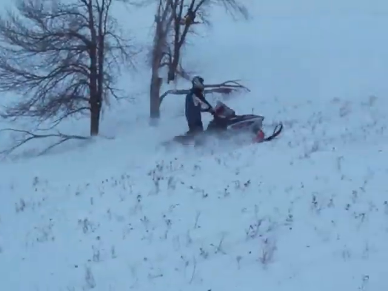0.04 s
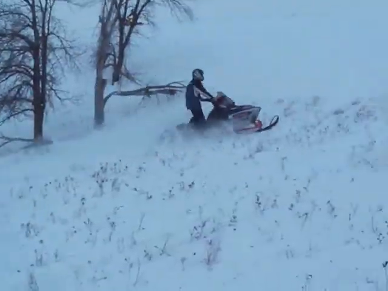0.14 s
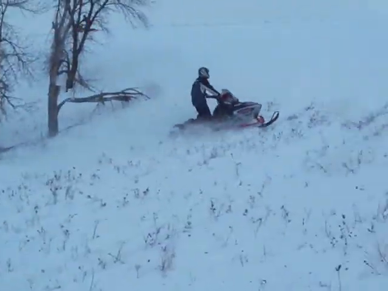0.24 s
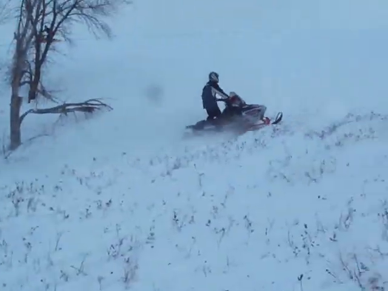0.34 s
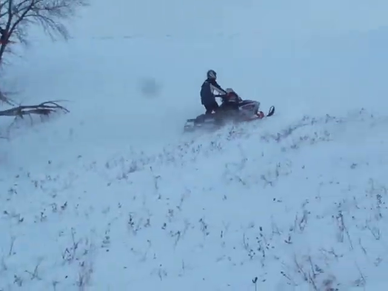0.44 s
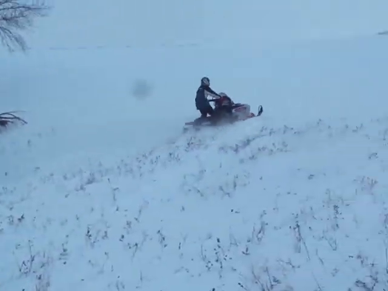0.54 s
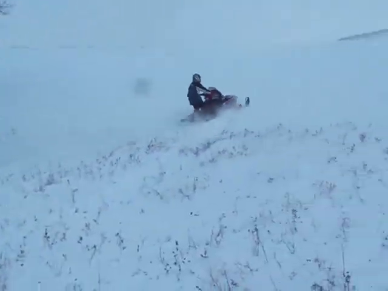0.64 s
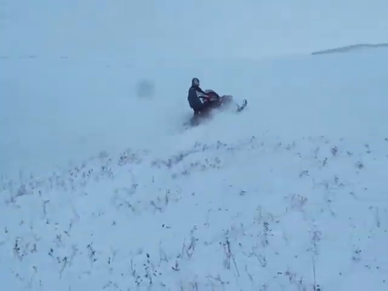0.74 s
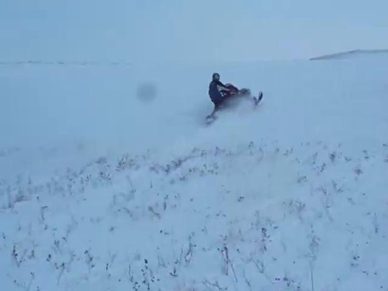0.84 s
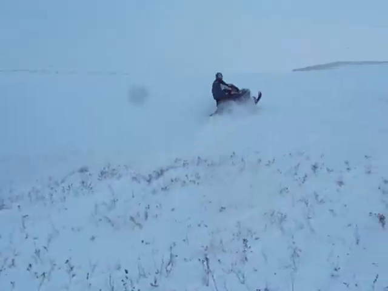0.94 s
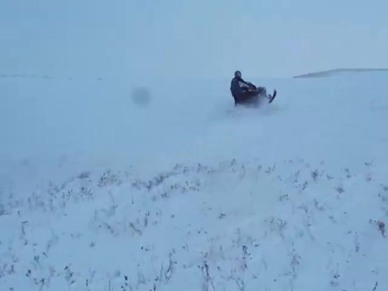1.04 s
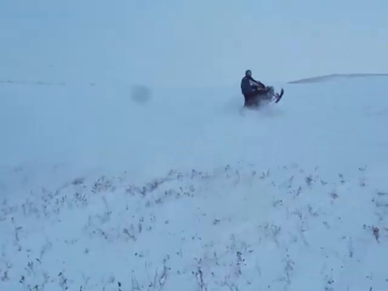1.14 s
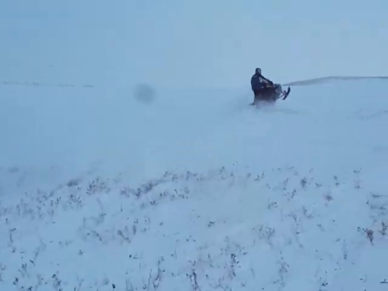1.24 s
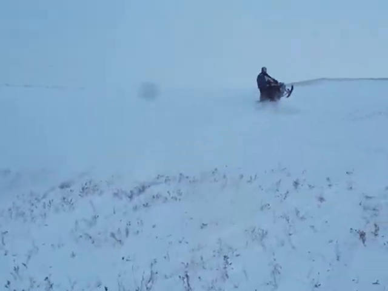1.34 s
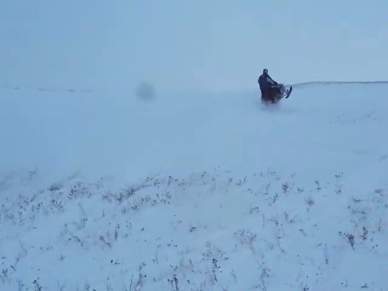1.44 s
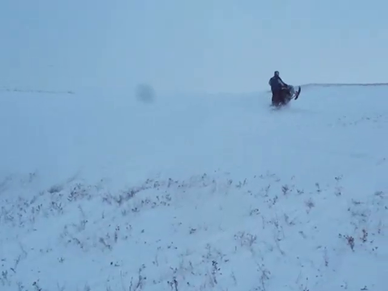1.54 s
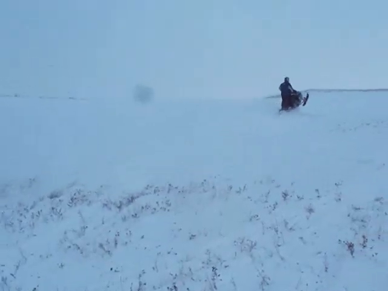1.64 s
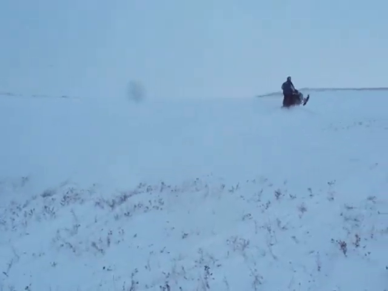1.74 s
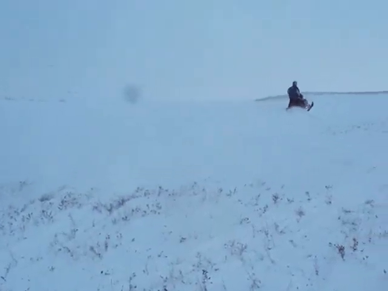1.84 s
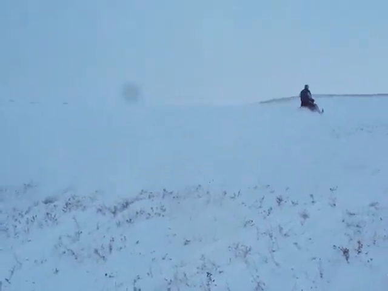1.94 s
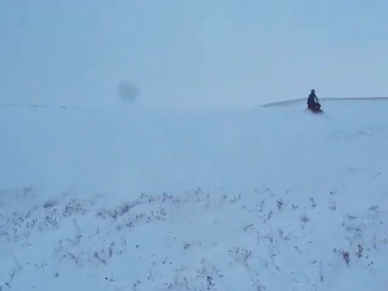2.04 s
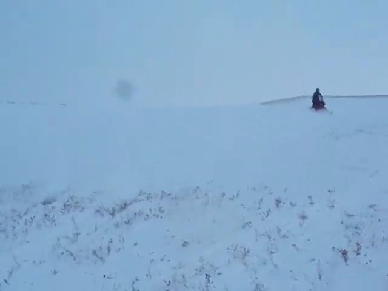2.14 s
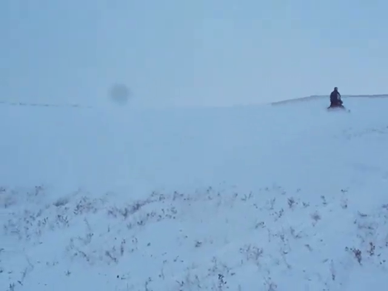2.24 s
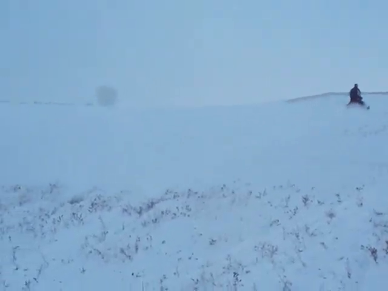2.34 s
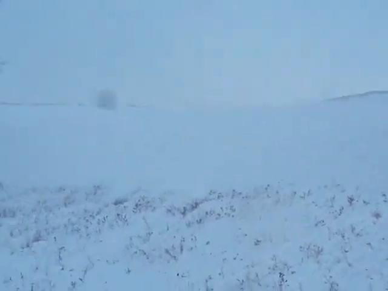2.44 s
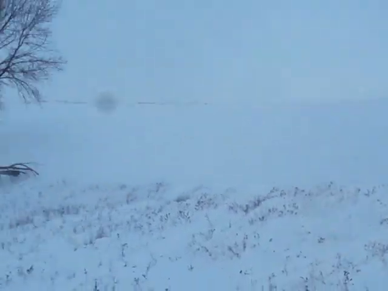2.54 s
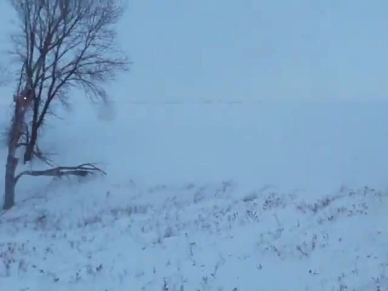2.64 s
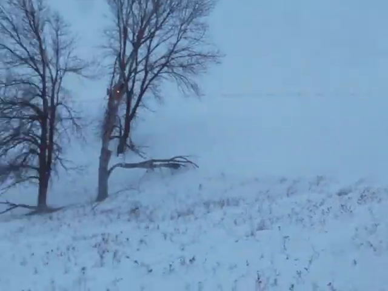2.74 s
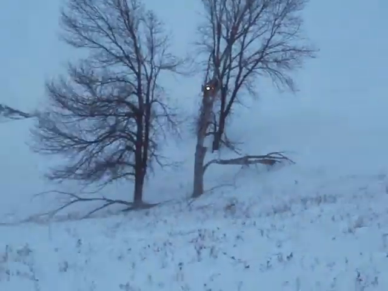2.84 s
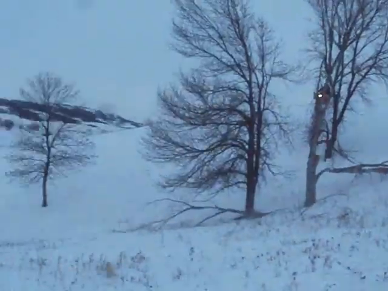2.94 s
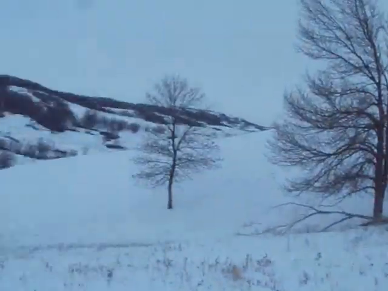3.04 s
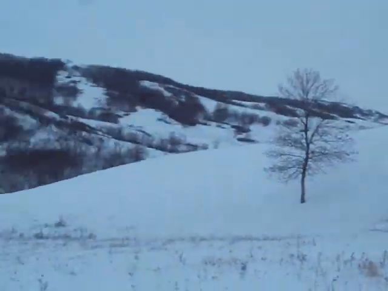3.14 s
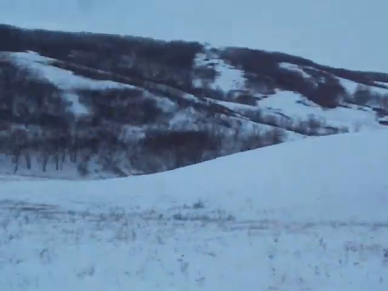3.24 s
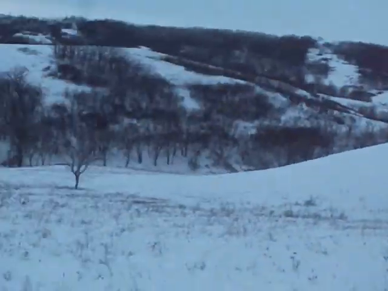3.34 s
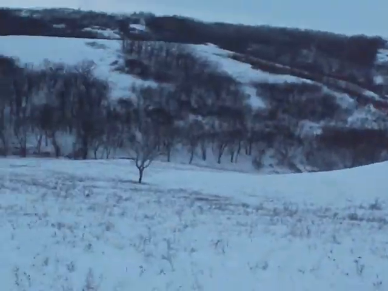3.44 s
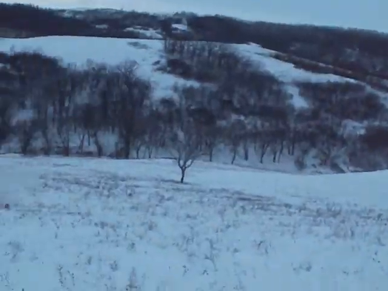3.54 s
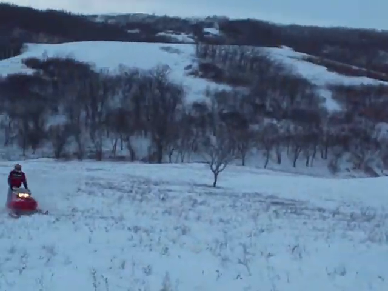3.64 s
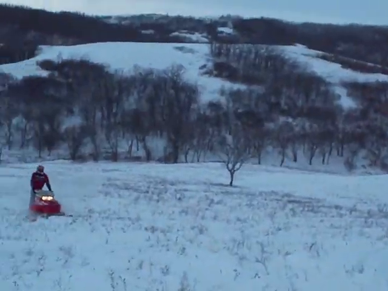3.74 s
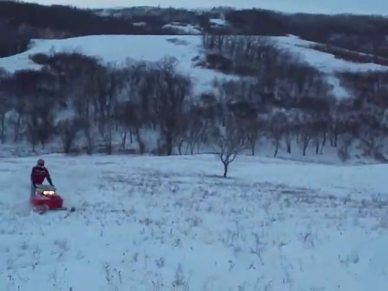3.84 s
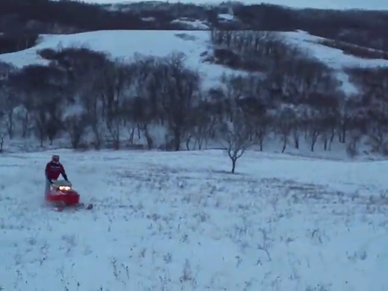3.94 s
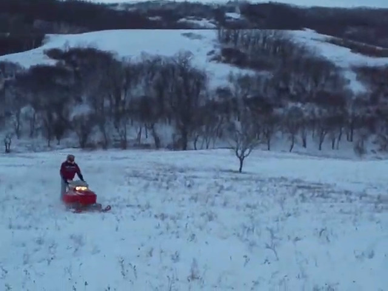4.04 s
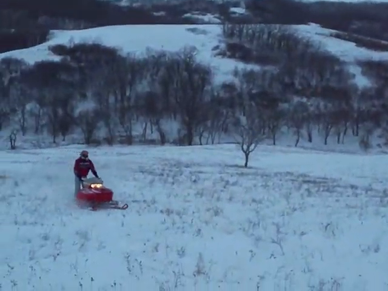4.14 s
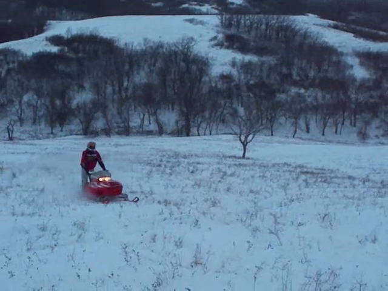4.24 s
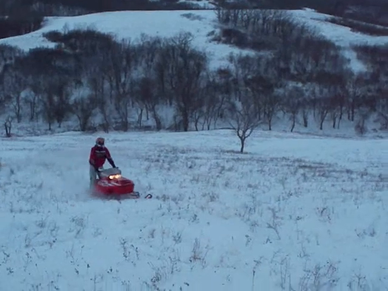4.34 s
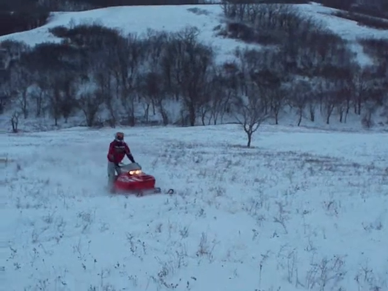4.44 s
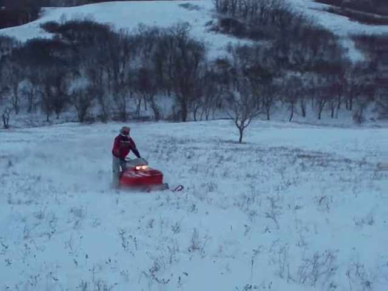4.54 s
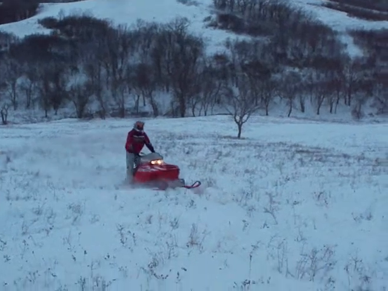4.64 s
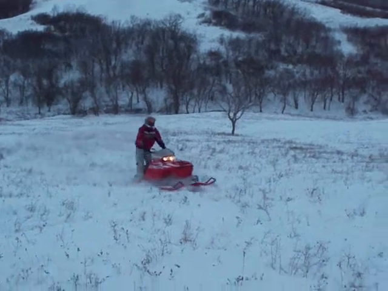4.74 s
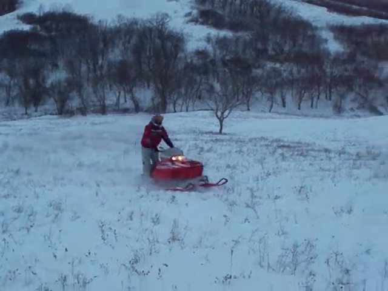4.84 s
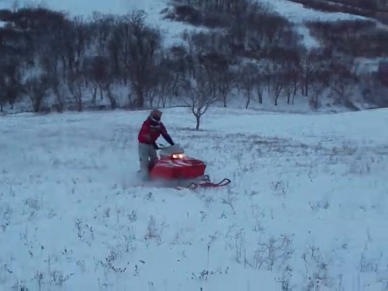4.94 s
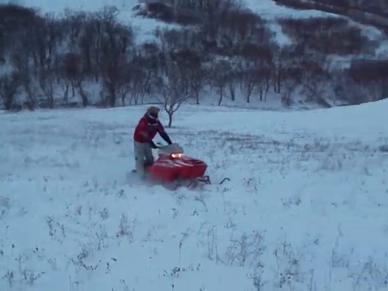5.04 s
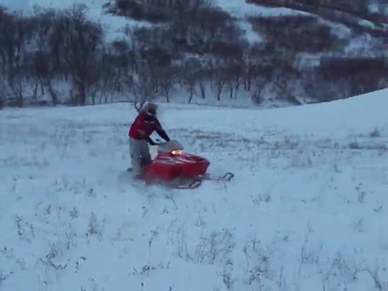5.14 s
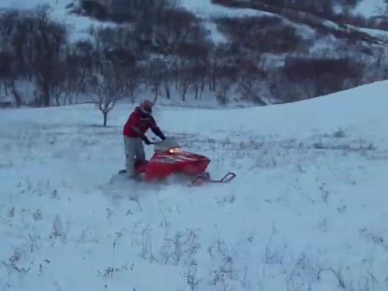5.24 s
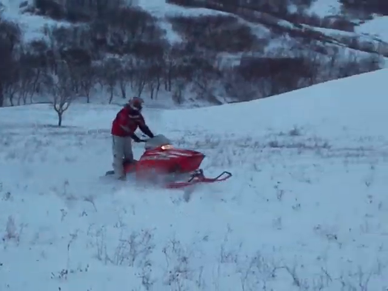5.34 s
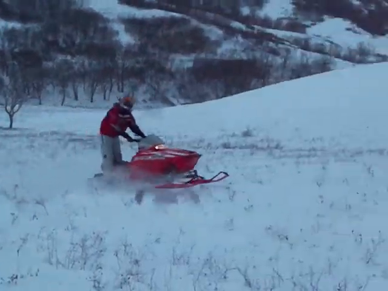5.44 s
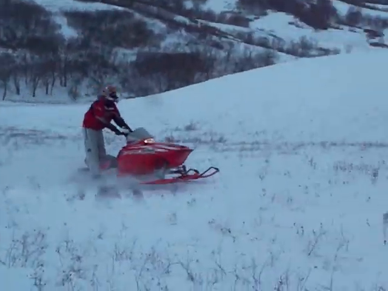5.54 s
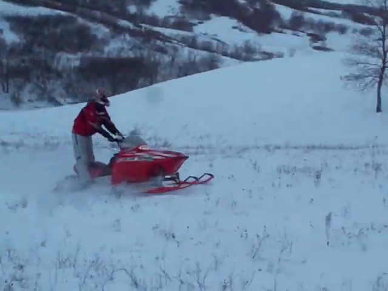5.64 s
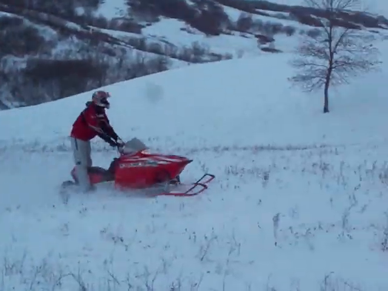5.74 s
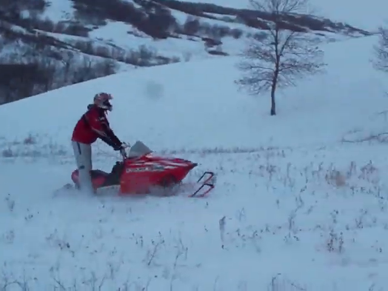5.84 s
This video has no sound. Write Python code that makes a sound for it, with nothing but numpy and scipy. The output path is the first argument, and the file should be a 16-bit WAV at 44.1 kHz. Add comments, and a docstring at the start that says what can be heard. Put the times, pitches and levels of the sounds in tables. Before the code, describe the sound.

High-revving snowmobile climbs away over a snowy hill and cuts out of earshot; another approaches from afar, growing raspy amid wind buffeting.

```python
"""Two two-stroke snowmobiles at full throttle on a snowy hillside, heard through a small camera.
At first the near sled climbs past in two bursts of throttle, turns away and drops behind the crest.
The other, faint until then, comes in from far across the field while gusts pop on the microphone.
Exhaust pulses are sums of firing orders; track, thrown snow, wind and open air are coloured noise."""
import sys
import numpy as np
from scipy import signal
from scipy.fft import rfft, irfft, next_fast_len
from scipy.io import wavfile

SR = 44100
rng = np.random.default_rng(int(sys.argv[2]) if len(sys.argv) > 2 else 0)


def master_out(mix):
    """Clip the mix to full scale and print it as 16-bit PCM to the path in sys.argv[1]."""
    frames = np.transpose(np.atleast_2d(mix))
    ceiling = np.clip(frames, -1, 1)
    pcm = np.round(ceiling * 32767).astype(np.int16)
    wavfile.write(sys.argv[1], SR, pcm)


N = 260190
TIME = np.arange(N) / SR


def climber():
    """The near sled: its layers follow the throttle; turning away and nearing the crest shift their balance."""
    # loudness over two bursts of throttle: t/s, level/dB (against full throttle)
    throttle = [(0, -4.5), (.07, -3.5), (.16, 0.6), (.37, -0.5), (.43, -5), (.5, -5.5), (.57, -9.5),
                (.7, -7), (.77, -9.5), (.82, -7.5), (1.0, 0), (1.2, -1.5), (1.47, -2), (1.63, -8),
                (1.8, -10.5), (1.88, -18)]
    # engine speed: t/s, f/Hz (firings per second)
    revs = [(0, 253), (.09, 257.5), (.16, 266), (.27, 270.5), (.47, 265.7), (.7, 258.7), (.82, 259),
            (.98, 268.7), (1.1, 270.3), (1.23, 270), (1.36, 264.5), (1.46, 269), (1.53, 262.5), (1.7, 256),
            (1.8, 256), (1.87, 253)]
    # strength of the firing orders: order, level/dB (counts only against its own group in exhaust)
    order_table = [(1, -26), (2, -8), (3, 0), (4, -14), (5, -13.5), (6, -4.5), (7, 3), (8, -19), (9, -14),
                   (10, -18), (11, -20.5), (12, -15.5), (13, -18), (14, -21)]
    # layers: level/dB at full throttle from the side, slope/(dB per dB of loudness),
    # gain/dB by turning away, loss/dB near the crest
    layers = {"boom": (-15.5, .7, -3, -3), "bark": (-10.8, 1, .1, 0.2), "blare": (-17, 1.17, 5.5, 9.5),
              "rasp": (-11, 1.26, -2.5, 2.5), "edge": (-23.5, 1.33, -0.5, -4.5), "roar": (-25, .55, 1.5, 2),
              "hiss": (-30.5, 0.97, 3.5, 0.5)}
    # colour of the thrown snow: f/Hz, level/dB
    snow_colour = [(3300, -10.5), (4500, -7), (5200, -13), (5800, -7), (6500, -4), (7400, -4), (8000, -16)]

    rev_hz, = in_time(revs)
    loud_db, = in_time(throttle)
    away = ramp(0.31, 1.0)
    crest = ramp(1.34, 1.72)
    boom_db, bark_db, blare_db, rasp_db, edge_db, roar_db, hiss_db = [
        db + slope * loud_db + turn_db * away - crest_db * crest
        for db, slope, turn_db, crest_db in layers.values()]
    rasp_side_db, rasp_tail_db = -9, 9.5  # brightness of the rasp from the side and from behind
    bright_db = rasp_side_db + (rasp_tail_db - rasp_side_db) * ramp(.5, 1.25)

    phase = firing_phase(rev_hz, jitter=0.012)
    levels_db = [boom_db, bark_db, blare_db, rasp_db, edge_db - 2.5]
    orders_db = np.array(order_table)[:, 1]
    pipe = exhaust(phase, levels_db, orders_db, bright_db, half_db=-24, smear=0.042,
                   flutter_db=0.87, thump_db=-32.5, whine_db=-8.0)
    rush_db = -12 + 6 * away - 0.5 * crest  # rush of the spinning track against the edge
    noise = running_noise(phase, roar_db, edge_db, hiss_db, snow_colour,
                          rush_db=rush_db, buzz_db=-4, depth=1.0)
    return ground_echo(pipe + noise, share=1 - ramp(0.65, 1.0))


def follower():
    """The far sled: its timbre shifts as it comes into the open, turns side-on and draws level."""
    # loudness and two layers: t/s, level/dB (against its closest), rasp level/dB, thrown-snow hiss level/dB
    approach = [(1.9, -19, -32.5, -54.5), (2.2, -16.5, -32, -58.5), (2.65, -16.5, -34, -55.5),
                (2.8, -5, -29, -35.5), (3.13, -5, -28.5, -29), (3.21, -6, -32, -33.5),
                (3.36, -4, -30, -32.5), (3.44, -9.5, -27.5, -37), (3.55, -6.5, -24, -32.5),
                (3.64, -15, -27.5, -44), (4.22, -10.5, -28, -42.5), (4.42, -18, -33.5, -42),
                (4.68, -10.5, -29, -42.5), (5.03, -3, -21.5, -36.5), (5.09, -10, -27, -37.5),
                (5.19, -2, -17, -32.5), (5.3, -4, -28, -38), (5.52, -0.5, -12.5, -39),
                (5.8, -4, -18.5, -33.5), (5.9, -5.5, -19.5, -37)]
    # engine speed: t/s, f/Hz (firings per second)
    revs = [(1.9, 266.4), (2.1, 268), (2.24, 265.3), (2.95, 268.5), (3.07, 267.5), (3.25, 271),
            (3.55, 268.7), (3.68, 266), (3.82, 271), (3.98, 269.5), (4.22, 272.3), (4.52, 265),
            (4.63, 271.5), (4.87, 269.5), (5.03, 274.7), (5.09, 265), (5.15, 261.6), (5.25, 270),
            (5.45, 269.8), (5.6, 271.3), (5.71, 268.3), (5.8, 261), (5.9, 256)]
    # firing orders before it turns side-on: order, level/dB (counts only against its own group in exhaust)
    far_orders = [(1, -12), (2, 0), (3, -14), (4, -8), (5, -10), (6, 0), (7, -8.5), (8, -13), (9, -11),
                  (10, -15), (11, -12.5), (12, -31), (13, -19), (14, -61.5)]
    # firing orders once it is side-on: order, level/dB (likewise)
    near_orders = [(1, -14), (2, 0), (3, -7), (4, 0), (5, -10.5), (6, -9), (7, 5.5), (8, -19), (9, -17.5),
                   (10, -38), (11, -23), (12, -34), (13, -25.5), (14, -34.5)]
    # layers: level/dB at full loudness, slope/(dB per dB of loudness),
    # gain/dB on coming into the open, gain/dB by turning side-on, gain/dB by drawing level
    layers = {"boom": (-12, 1, -0.5, 1.5, -0.5), "bark": (-32.5, 0.5, 10.5, -1.5, 2),
              "blare": (-17, 0.98, -2.5, 0.5, 4), "edge": (-21.5, 1.27, -6, .6, .3),
              "roar": (-23, 0.9, 0.5, -1.2, 0.4)}
    # colour of the thrown snow: f/Hz, level/dB
    snow_colour = [(3300, -25), (4500, -10), (5200, -10.5), (5800, -3), (6500, -3.5), (7400, -4),
                   (8000, -19.5)]

    rev_hz, = in_time(revs)
    loud_db, rasp_db, hiss_db = in_time(approach)
    in_open = ramp(2.99, 3.37)
    side_on = ramp(3.4, 4.7)
    level_with = ramp(5.18, 5.51)
    boom_db, bark_db, blare_db, edge_db, roar_db = [
        db + slope * loud_db + open_db * in_open + turn_db * side_on + level_db * level_with
        for db, slope, open_db, turn_db, level_db in layers.values()]
    # half-order lines: strong from afar, fading 14 dB per second as the sled closes in
    half_db = -1.5 - 14 * np.maximum(TIME - 3.9, 0)
    bright_db = -10 + 9.3 * ramp(4.3, 4.9)  # the rasp brightens as the sled comes close
    thump_db = -22 - 8 * ramp(5.32, 5.9)  # and its lowest note thins out
    far_db = np.array(far_orders)[:, 1:]
    near_db = np.array(near_orders)[:, 1:]
    orders_db = far_db * (1 - side_on) + near_db * side_on

    phase = firing_phase(rev_hz, jitter=.016)
    smear = np.interp(TIME, [2.5, 5.5], [.3, .11])  # distance spreads each pulse out in time
    levels_db = [boom_db, bark_db, blare_db, rasp_db, edge_db]
    pipe = exhaust(phase, levels_db, orders_db, bright_db, half_db, smear=smear, flutter_db=0.9955,
                   thump_db=thump_db, whine_db=-2 - 11.3 * side_on)
    noise = running_noise(phase, roar_db, edge_db, hiss_db, snow_colour,
                          rush_db=-12 - 3 * side_on, buzz_db=-0.5, depth=0.37)
    return ground_echo(pipe + noise, share=.6 * (1 - ramp(4.4, 4.6)))


def firing_phase(rev_hz, jitter):
    """Firing angle in radians; combustion makes each pulse a little early or late."""
    return 2 * np.pi * np.cumsum(rev_hz) / SR + jitter * drift(130)


def exhaust(phase, levels_db, orders_db, bright_db, half_db, smear, flutter_db, thump_db, whine_db):
    """Pressure pulses as a stack of firing orders, grouped by the pipe resonance that carries them."""
    # lines between the firing orders, from unequal cylinders: order, level/dB (before half_db)
    half_orders = [(1.5, -19), (3.5, -3), (4.5, -14), (5.5, -1), (6.5, -4.5), (7.5, -15), (8.5, -18),
                   (9.5, -14.5), (11.5, -28.5)]

    boom, bark, blare, rasp, edge = [from_db(db) for db in levels_db]
    weight = dict(enumerate(from_db(orders_db), 1))
    # the rasp leans to its upper or lower order; this replaces the tabled order 7
    weight[7] = weight[6] * from_db(bright_db)
    thump = np.sqrt(boom) * from_db(thump_db)
    whine = np.sqrt(rasp * edge) * from_db(whine_db)
    groups = [([1], thump), ([2], boom), ([3], bark), ([4, 5], blare),
              ([6, 7], rasp), ([8], whine), (range(9, 15), edge)]
    out = np.zeros(N)
    for members, level in groups:
        total = np.sqrt(sum(weight[k] ** 2 for k in members))
        for k in members:
            # turbulent air makes high orders flutter most
            flutter = from_db(flutter_db * np.sqrt(k) * (drift(13) + .45 * drift(70)))
            # the pipe delays high orders
            tone = np.cos(k * phase - smear * k * k)
            out -= level * weight[k] / total * flutter * tone
    for k, db in half_orders:
        level = np.sqrt(blare * rasp) * from_db(half_db + db + 1.3 * drift(7.02))
        out -= level * np.cos(k * phase + rng.uniform(0, 2 * np.pi))
    return out


def running_noise(phase, roar_db, edge_db, hiss_db, hiss_colour, rush_db, buzz_db, depth):
    """Roar, rush and hiss of a sled, with a fine buzz from the steep pulse fronts."""
    # track digs in and churns up snow, swelling the noise of either sled:
    # t/s, time to 1/e of the swell/s, hiss gain/dB, roar gain/dB
    sprays = [(1.485, .04, 7, 4.5), (1.79, 0.074, 6, 1.5), (3.467, 0.12, 1.5, 6)]
    # colour of track and clutch roar: f/Hz, level/dB
    roar_colour = [(40, -36), (120, -37), (250, -21), (420, -15.5), (700, -7.5), (1050, -7), (1500, -3),
                   (1900, -6), (2250, -14), (3000, -20.5)]
    # colour of the track's rush: f/Hz, level/dB
    rush_colour = [(1800, -37.5), (2300, -11.5), (2750, -1.5), (3300, 5.5), (3800, -8), (4600, -8.5)]

    for s, width_s, more_hiss_db, more_roar_db in sprays:
        spray = np.exp(-((TIME - s) / width_s) ** 2)
        hiss_db = hiss_db + more_hiss_db * spray
        roar_db = roar_db + more_roar_db * spray
    roar = from_db(roar_db) * pulsed_noise(phase, roar_colour, depth=0.16, flutter_db=0.9)
    rush = from_db(edge_db + rush_db) * pulsed_noise(phase, rush_colour, depth=0.087, flutter_db=1.0)
    hiss = from_db(hiss_db - 0.56) * pulsed_noise(phase, hiss_colour, depth, flutter_db=1.57)
    # high firing orders, each with its own flutter and unsteady phase
    fronts = sum(from_db(3.9 * drift(16)) * np.cos(k * phase + 1.5 * drift(25)) for k in range(15, 31))
    buzz = from_db(hiss_db + buzz_db) * coloured(fronts, hiss_colour)
    return roar + rush + hiss + buzz


def pulsed_noise(phase, colour, depth, flutter_db):
    """Noise that swells with every firing."""
    swell = np.exp(depth * np.cos(phase) + 0.2 * drift(200))
    noise = rng.standard_normal(N) * swell
    return coloured(noise, colour) * from_db(flutter_db * drift(35))


def ground_echo(x, share):
    """Thin a narrow band in which the echo off the snow arrives against the direct sound."""
    null_hz, null_q, strength = 2680, 5.2, 0.4
    band = signal.lfilter(*signal.iirpeak(null_hz, null_q, fs=SR), x)
    return x - strength * share * band


def wind(wind_db):
    """Eddies break on the microphone port: dense lumpy rumble and single blunt pops."""
    # single buffets: t/s (1 ms ahead of the pop's centre), level/dB (4 dB above the pop's peak)
    buffets = [(3.473, -17), (3.575, -5), (3.612, -10), (3.821, -1.5), (3.892, 4), (3.951, -10),
               (4.042, -2), (4.073, -6), (4.19, -5.5), (4.219, -2.5), (4.255, -2), (4.339, -2), (4.385, -3),
               (4.409, -14), (4.435, -7), (4.463, -6), (4.534, -2), (4.608, -1.5), (4.704, -16),
               (4.725, -21)]
    # colour of the rumble: f/Hz, level/dB
    rumble_colour = [(25, -35), (50, -13), (90, -7), (150, -2), (250, -0.5), (420, -0.5), (700, -6.5),
                     (1000, -9), (1600, -18.5), (3000, -32.5), (6000, -48)]

    lumps = from_db(2.5 * drift(130) + .9 * drift(35))
    rumble = from_db(wind_db + 9.5) * coloured(rng.standard_normal(N) * lumps, rumble_colour)
    pops = np.zeros(N)
    draws = rng.uniform(-0.83, 1, (len(buffets), 2))
    for (s, db), (pitch, sign) in zip(buffets, draws):
        # a pop is about one cycle long, pitched around 560 Hz
        pop_hz = 560 * from_db(2 * pitch)
        angle = (TIME - s - .001) * 2 * np.pi * pop_hz
        near = np.abs(angle) < 20
        pop = np.cos(angle[near]) * np.exp(-(angle[near] / 4) ** 2)
        pops[near] += np.sign(sign) * from_db(db - 4.0) * pop
    return rumble + pops


def gusts():
    """Wind strength in dB: each gust rises fast, holds and dies away, with a slight flutter throughout."""
    # gusts on the microphone: start t/s, hold/s, level/dB (before the rumble's own gain)
    gust_table = [(0.079, .05, -32.5), (0.173, 0.083, -36.5), (.3, 0.12, -46.5), (0.635, 0.033, -47.5),
                  (1.708, 0.029, -50), (1.983, 0.013, -51), (2.206, 0.02, -43.5), (2.723, 0.67, -45.5),
                  (3.0, 0.056, -39), (3.176, 0.048, -37.5), (3.466, 0.017, -34), (3.596, .64, -29.5),
                  (4.296, .24, -30.5), (4.597, 0.012, -32), (4.71, 0.084, -34.5), (5.04, .01, -34),
                  (5.138, .02, -42), (5.277, 0.013, -44.5), (5.692, .2, -50)]
    rise_db_per_s, fall_db_per_s, flutter_db = 447, 146.5, -0.07
    each = [db - rise_db_per_s * np.maximum(start - TIME, 0)
            - fall_db_per_s * np.maximum(TIME - start - hold, 0)
            for start, hold, db in gust_table]
    return np.max(each, axis=0) + flutter_db * drift(20)


def breeze():
    """The low steady rush of open air under everything, as faint coloured noise."""
    # colour of the open air: f/Hz, level/dB
    air_colour = [(25, -3), (90, -3), (180, -1.5), (400, -3.5), (800, -17.5)]
    return from_db(-54.5) * coloured(rng.standard_normal(N), air_colour)


def dips():
    """Gain of the brief, abrupt dips in level, with steep edges."""
    # dips: start t/s, end t/s, level/dB
    dip_table = [(0.51, .657, -3), (0.726, 0.788, -5), (3.173, 3.205, -4.5), (3.479, 3.519, -3),
                 (4.585, 4.592, -7)]
    edge_s = .008
    total_db = 0
    for start, end, db in dip_table:
        inside_s = np.minimum(TIME - start, end - TIME)
        total_db = total_db + db * np.clip(inside_s / edge_s + .5, 0, 1)
    return from_db(total_db)


def from_db(db):
    """Decibels to gain."""
    return 10 ** (np.asarray(db) / 20)


def rms_one(x):
    """Scale to unit power."""
    return x / np.sqrt(np.mean(x ** 2) + 1e-20)


def in_time(rows):
    """Each column of a curve table at every sample."""
    s, *columns = np.transpose(rows)
    return [np.interp(TIME, s, c) for c in columns]


def ramp(start_s, end_s):
    """Progress of a move, from 0 to 1."""
    return np.clip((TIME - start_s) / (end_s - start_s), 0, 1)


def drift(rate):
    """Smooth random wander of spread 1, changing about rate times a second."""
    knots = rng.standard_normal(4096) * np.sqrt(3 / 2)  # makes up for the spread lost between knots
    return np.interp(TIME * rate, np.arange(len(knots)), knots)


def coloured(x, colour):
    """Filter to a colour that falls 20 dB per octave beyond its end points; unit power."""
    hz, db = np.transpose(colour)
    size = next_fast_len(N)
    octave = np.log2(np.maximum(np.fft.rfftfreq(size, 1 / SR), 1))
    outside = np.abs(octave - np.clip(octave, np.log2(hz[0]), np.log2(hz[-1])))
    gain = from_db(np.interp(octave, np.log2(hz), db) - 20 * outside)
    return rms_one(irfft(rfft(x, size) * gain, size)[:N])


def scene():
    """The crest hides the first sled within a moment and leaves the second one alone."""
    in_sight = 1 - ramp(1.885, 1.92)
    sleds = in_sight * climber() + follower()
    return (dips() * (sleds + wind(gusts())) + breeze())[None]


def record(dry):
    """The whole sound has a narrow gap in the treble, rounded highest peaks, and little deep bass or top."""
    gap_hz, gap_q, bass_cut_hz, top_cut_hz = 4220, 10, 30, 7950
    gap = signal.iirnotch(gap_hz, gap_q, fs=SR)
    gapped = signal.lfilter(*gap, signal.lfilter(*gap, dry))  # twice, for a wider gap
    rounded = .95 * gapped / (1 + (gapped / 1.02) ** 20) ** (1 / 20)
    bass_cut = signal.butter(1, bass_cut_hz, "high", fs=SR, output="sos")
    thinned = signal.sosfilt(bass_cut, rounded)
    top_cut = signal.ellip(10, .2, 80, top_cut_hz, fs=SR, output="sos")
    return signal.sosfilt(top_cut, thinned)


dry = scene()
out = record(dry)
master_out(out)
```